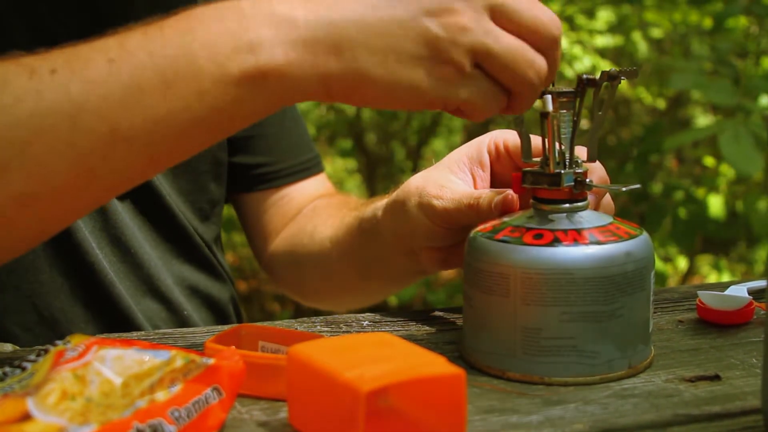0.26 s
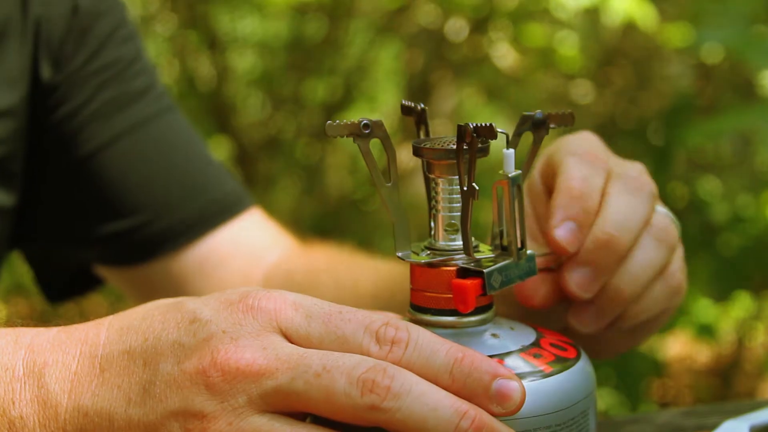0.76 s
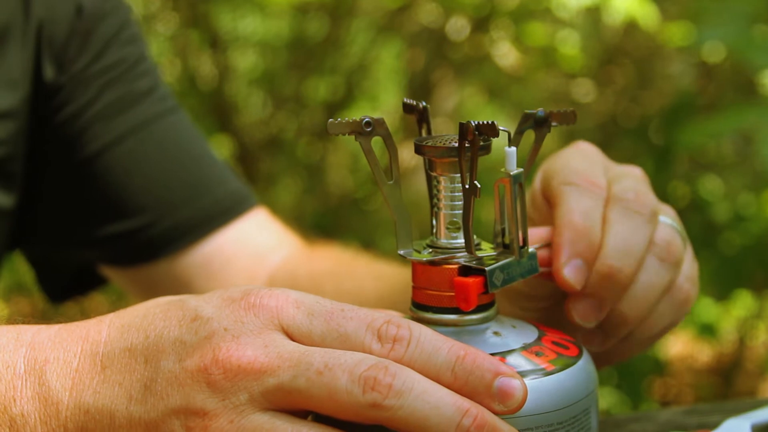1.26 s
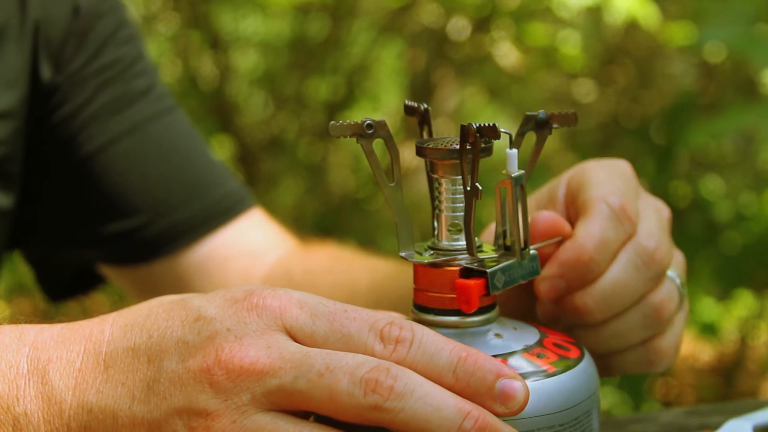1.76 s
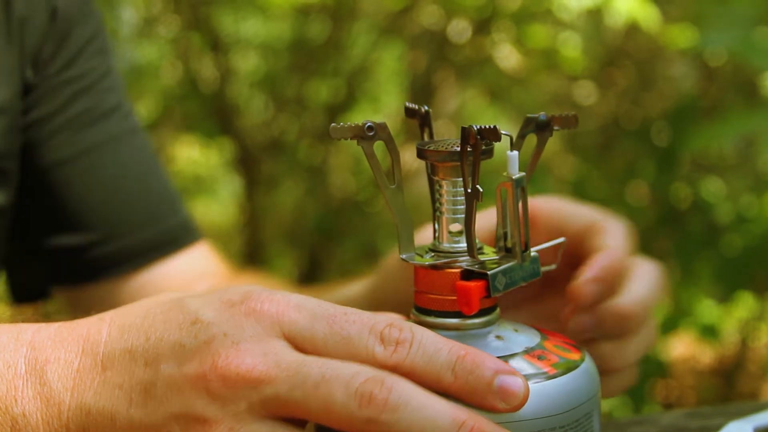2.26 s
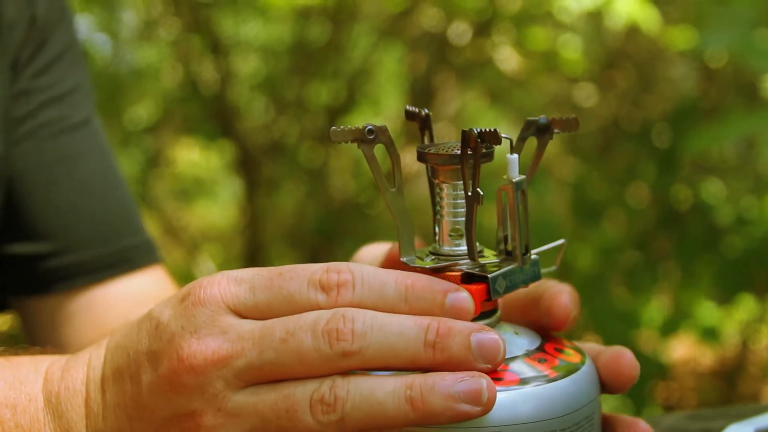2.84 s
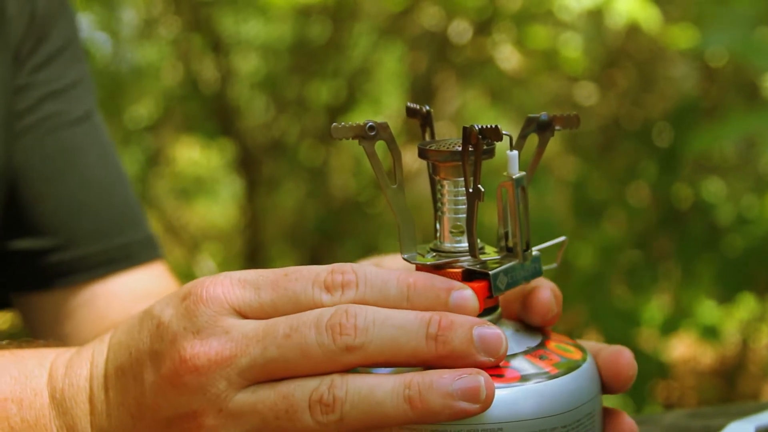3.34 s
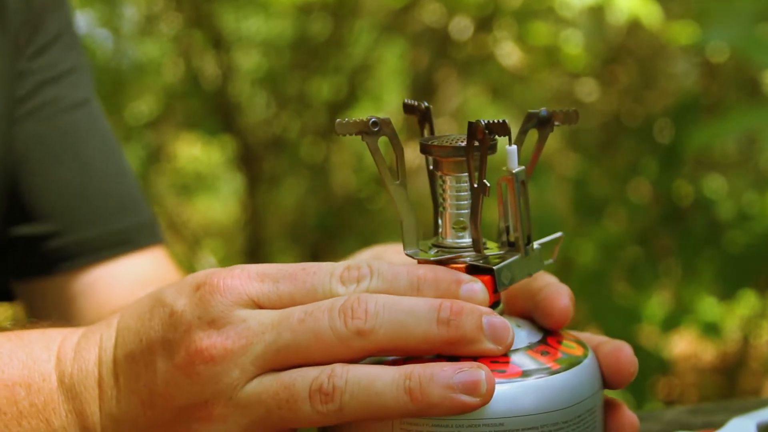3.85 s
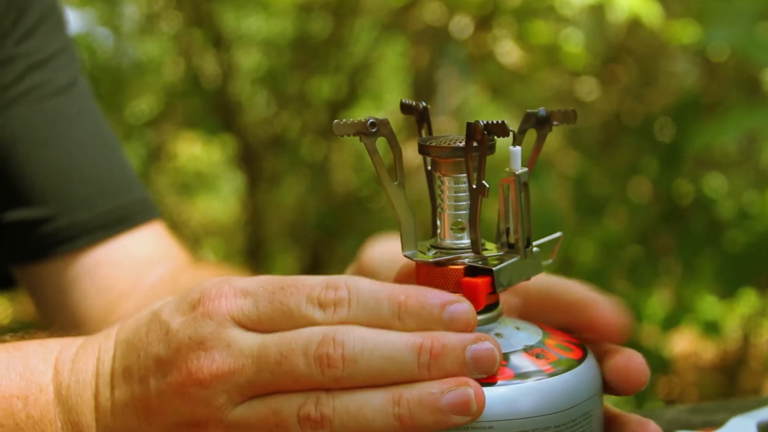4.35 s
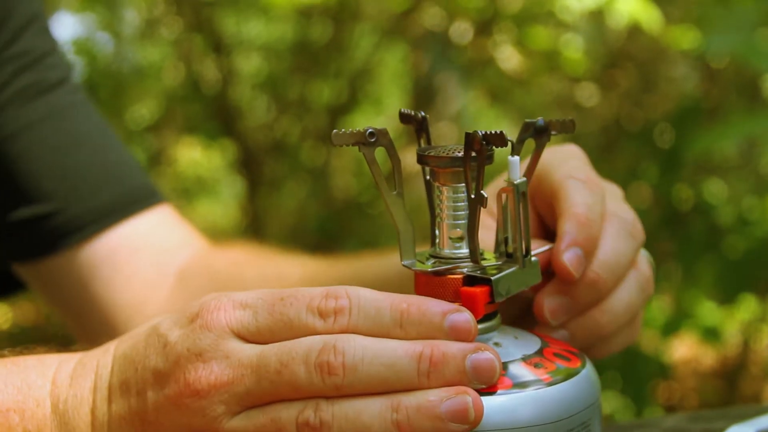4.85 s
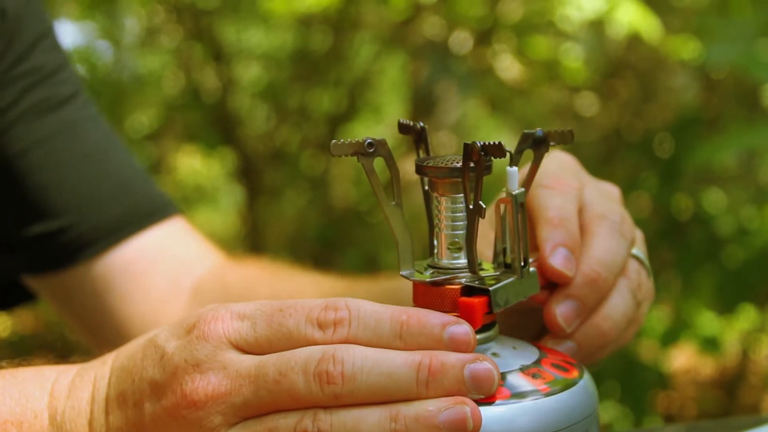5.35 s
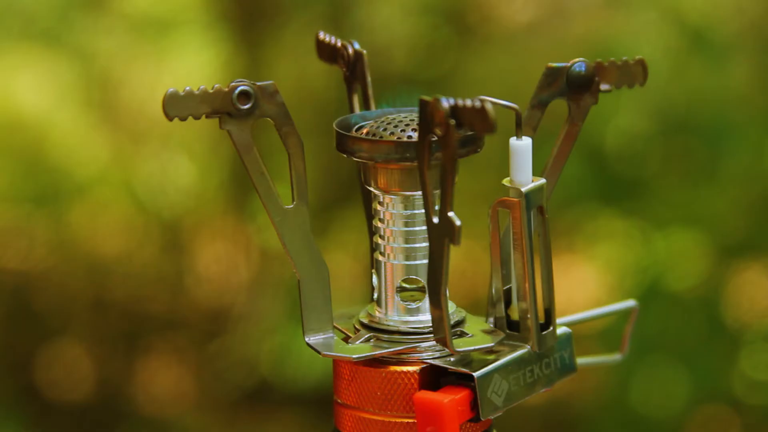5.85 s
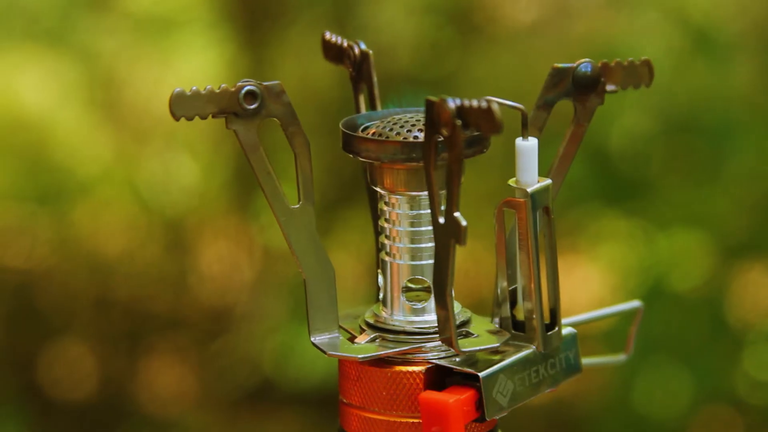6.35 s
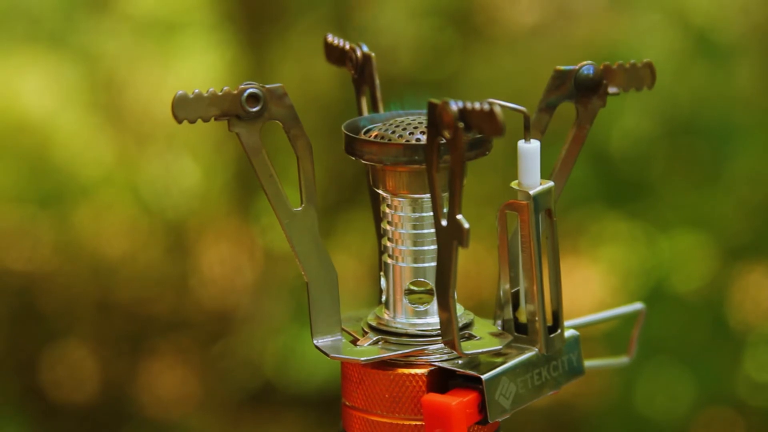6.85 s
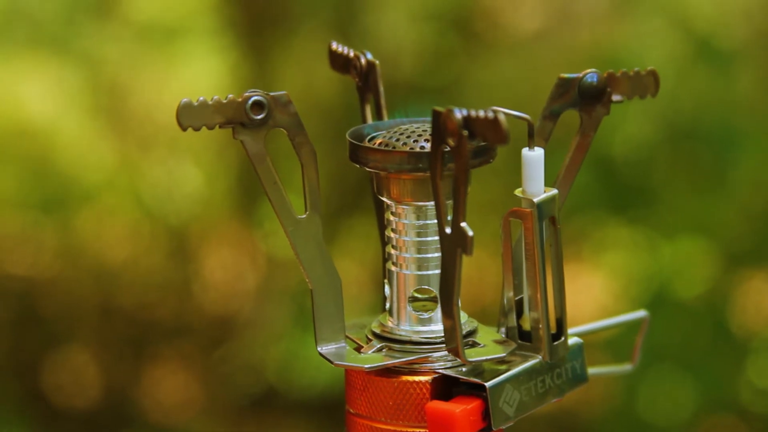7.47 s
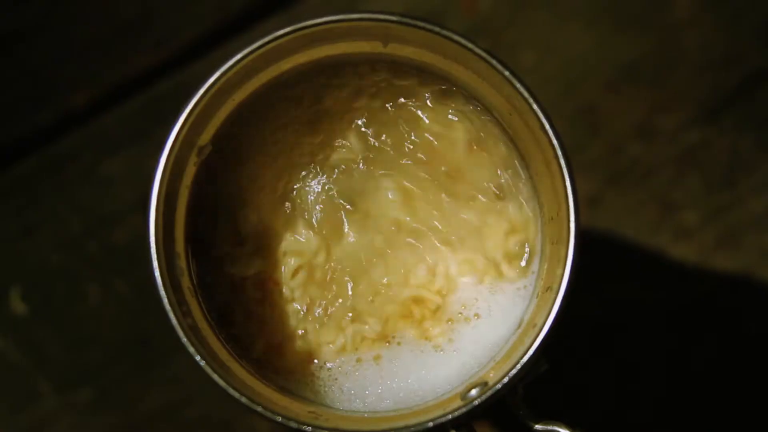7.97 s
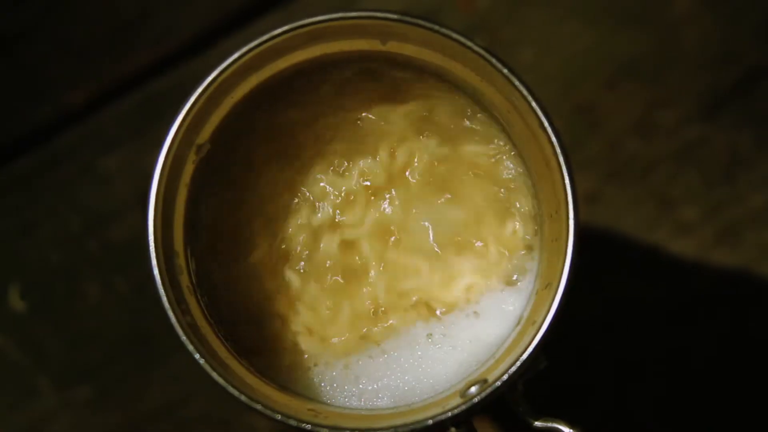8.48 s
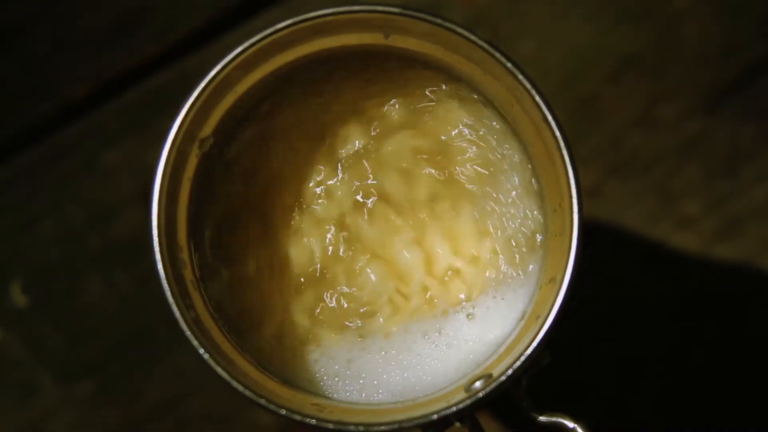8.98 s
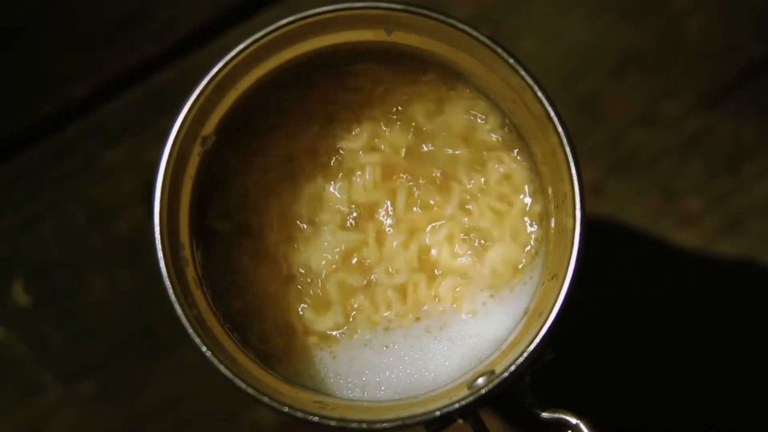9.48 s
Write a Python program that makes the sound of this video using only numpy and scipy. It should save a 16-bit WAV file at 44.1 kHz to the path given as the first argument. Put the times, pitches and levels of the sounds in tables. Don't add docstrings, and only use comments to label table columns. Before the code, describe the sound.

Outdoors, a camp stove clicks, hisses and lights with an overloaded roar, then burns close up with metal knocks before a pot simmers.

```python
import sys
import numpy as np
from scipy import signal
from scipy.fft import rfft, irfft, next_fast_len
from scipy.io import wavfile
from scipy.ndimage import map_coordinates

SR = 44100
rng = np.random.default_rng(int(sys.argv[2]) if len(sys.argv) > 2 else 0)


def transcribe(u):
    v = np.clip(np.atleast_2d(u).T, -1, 1)
    q = np.round(v * 32767).astype(np.int16)
    wavfile.write(sys.argv[1], SR, q)


def volts_from_decibels(level):
    exponent = np.asarray(level, float) / 20
    return 10 ** exponent


N = 428652


def rms_one(x):
    return x / np.sqrt(np.mean(x ** 2) + 1e-20)


def in_time(rows):
    s, *columns = np.transpose(rows)
    first = max(round(s[0] * SR), 0)
    last = min(round(s[-1] * SR), N)
    t = np.arange(first, last) / SR
    return first, [np.interp(t, s, column) for column in columns]


def add(track, first, sound):
    track[first:first + len(sound)] += sound


def low_pass(x, hz):
    return signal.sosfilt(signal.butter(2, hz, fs=SR, output="sos"), x)


def high_pass(x, hz):
    return signal.sosfilt(signal.butter(2, hz, "high", fs=SR, output="sos"), x)


def drift(size, rate):
    r = np.exp(-128 * np.pi * rate / SR)
    coarse = rng.standard_normal(size // 64 + 1002)
    slow = signal.lfilter([1], [1, -2 * r, r * r], coarse)[1000:]
    return np.interp(np.arange(size) / 64, np.arange(len(slow)), rms_one(slow))


def turbulence(spectrum, size, gust_db, patchy_db, count=6):
    padded = next_fast_len(size)
    log_hz = np.log(np.arange(1, padded // 2 + 2) * SR / padded)
    hz, db = np.transpose(spectrum)
    colour = volts_from_decibels(np.interp(log_hz, np.log(hz), db, left=-90, right=-90))
    tone = rfft(rng.standard_normal(padded)) * colour
    place = np.interp(log_hz, np.log(hz[[0, -1]]), [0, count - 1])
    together = gust_db * (drift(size, 4.6) + drift(size, 24))
    total = np.zeros(size)
    for k in range(count):
        band = irfft(tone * np.clip(1 - abs(place - k), 0, 1), padded)[:size]
        total += band * volts_from_decibels(patchy_db * drift(size, 2.25))
    return rms_one(total * volts_from_decibels(together))


def narrow(centre_hz, width_hz):
    slow = low_pass(rng.standard_normal((2, len(centre_hz))), width_hz / 2)
    turn = 2 * np.pi * np.cumsum(centre_hz) / SR
    return rms_one(slow[0] * np.cos(turn) + slow[1] * np.sin(turn))


def ring(clicks, hz, t60):
    r = volts_from_decibels(-60 / (max(t60, .002) * SR))
    w = 2 * np.pi * min(hz, 20000) / SR
    return signal.lfilter([0, np.sin(w)], [1, -2 * r * np.cos(w), r * r], clicks + 1e-18)


def contact_crack(t, decay_s):
    return signal.lfilter([.5], [1, -.45], rng.standard_normal(len(t))) * np.exp(-t / decay_s)


def strike(track, hits, modes, trim_db, rattle_s, crack_db=-40):
    t = np.arange(6000) / SR
    for s, db in hits:
        contact = (1 + .4 * rng.standard_normal(len(t))) * t * np.exp(-t / rattle_s)
        strength_db = rng.normal(0, 1, len(modes))
        body = np.zeros(len(t))
        for k, (hz, level_db, t60) in enumerate(modes):
            tone = rms_one(ring(contact, hz, t60)) * np.sqrt(t60)
            body += (-1) ** k * volts_from_decibels(level_db + strength_db[k]) * tone
        crack = contact_crack(t, 0.0013)
        add(track, round(s * SR), volts_from_decibels(db + trim_db) * (body / abs(body).max() + volts_from_decibels(crack_db) * crack))


# (frequency [Hz], level [dB])
BREEZE_COLOUR = [(24, -42), (40, -16), (48, -21), (75, -5.5), (124, -1.5), (141, -6), (500, -19),
                 (650, -58), (1100, -120)]
# (frequency [Hz], level [dB])
INSECT_COLOUR = [(240, -40), (400, -8), (485, -20), (556, -4), (1160, -7), (1760, -5.5), (2910, -5),
                 (3640, 0.5), (4370, -8.5), (6000, -18), (7800, -43), (13200, -120)]
# (frequency [Hz], level [dB])
LEAK_COLOUR = [(2940, -33), (5000, -2), (7020, -5), (7380, -2), (7600, -6), (8300, -9), (10000, -16),
               (13000, -43), (22000, -120)]


def woods():
    view_change_s, end_s = .6, 4.03
    out, size = np.zeros(N), round(end_s * SR)
    later = np.arange(size) >= view_change_s * SR

    def level(before_db, after_db):
        return volts_from_decibels(np.where(later, after_db, before_db))

    air = level(-53.5, -57) * turbulence(BREEZE_COLOUR, size, 1.1, 0.58)
    air += level(-54, -55.5) * turbulence(INSECT_COLOUR, size, 0.87, 0.78)
    air += level(-47, -57.5) * turbulence([(25, 12), (50, -9), (85, -1.5)], size, 2.1, 1.5, count=2)
    air += level(-66, -60.5) * turbulence(LEAK_COLOUR, size, .4, .6, count=3)
    add(out, 0, air)
    return out


# (time [s], peak level [dB])
LEG_HITS = [
    (0.3601, -22.5),
    (0.371, -22.5),
]
# (frequency [Hz], level [dB], t60 [s])
LEG_TONES = [(644, -5, 0.027), (800, 2, 0.036), (965, -4, 0.038), (354, -10.5, 0.028), (2370, -22, 0.022),
             (1200, -17.5, 0.032)]
# (frequency [Hz], level [dB], t60 [s])
TINE_TONES = [(5250, -3, 0.022), (6050, -6, .01), (7080, -11, 0.023), (8000, 0, 0.005), (9500, -4, .006),
              (11000, -8, .006), (14000, -14, .004)]


def support_leg(track):
    strike(track, LEG_HITS, LEG_TONES, 1.2, 0.00058)
    strike(track, LEG_HITS[1:], TINE_TONES, -7.0, 0.0024)


def tink(hz, t60, crack_db):
    t = np.arange(6000) / SR
    rise = 1 - np.exp(-t / 0.00047)
    tone = np.sin(2 * np.pi * hz * t) * rise * volts_from_decibels(-60 * t / t60)
    return tone / abs(tone).max() + volts_from_decibels(crack_db) * contact_crack(t, 0.0011)


# (time [s], peak level [dB], pitch [Hz], t60 [s], crack re peak [dB])
LONE_TINKS = [(.3605, -37, 5500, 0.028, -6), (.364, -41, 6100, .015, -3), (.372, -46, 8200, .03, -20),
              (.361, -42, 8800, .012, 0), (.373, -42, 2350, .025, -20), (.393, -48, 5350, .04, -6),
              (.365, -33, 770, .03, -30), (.379, -43, 850, .04, -20), (.401, -50, 5400, .05, -6),
              (6.1695, -20, 1300, .012, -30), (6.174, -23, 3700, .012, -30), (0.372, -33.5, 7080, .1, 2),
              (.386, -46, 7150, 0.06, -3), (.385, -45, 5430, .07, -3), (.391, -46, 900, .06, -20),
              (.387, -43, 11400, .015, -20), (.529, -44, 780, .05, -20), (0.589, -47, 1000, .03, -20),
              (3.9, -37, 950, .03, -20), (4, -17, 3400, 0.0053, 4), (4.196, -17, 1800, .008, -10),
              (5.999, -26, 4000, .008, -8), (6.364, -18.5, 3800, 0.016, -30), (6.366, -21, 1900, .016, -30),
              (6.17, -16, 1800, .02, -30), (7.3, -13, 300, 0.037, -40), (7.3983, -11, 870, 0.06, -11),
              (7.3975, -22, 2500, .003, 0), (7.401, -30, 4800, .03, -20), (7.417, -21.5, 5150, 0.012, -10),
              (7.431, -27, 5300, .01, -10), (7.425, -31, 4900, .02, -20), (7.452, -29, 5900, .01, -10),
              (7.429, -29, 3600, .05, -20), (7.441, -25, 7300, .004, 2), (7.442, -26, 5760, .015, -10),
              (7.461, -25, 3200, 0.007, -6), (7.466, -23, 3170, .007, -12),
              (7.473, -17.5, 3500, 0.016, -30), (6.075, -29, 4000, .005, -6), (6.258, -21, 1260, .008, -20),
              (7.83, -46, 1090, 0.037, -20), (9.645, -32, 3600, .02, -25)]


def lone_tinks(track):
    for s, db, hz, t60, crack_db in LONE_TINKS:
        add(track, round(s * SR), volts_from_decibels(db) * tink(hz, t60, crack_db))


# (frequency [Hz], level per Hz [dB])
JET_COLOUR = [(2940, -19.5), (5000, -11.5), (6450, -8), (7160, 0.5), (7930, 1), (9300, -0.5), (10000, -8.5),
              (13000, -35), (22000, -120)]
# (frequency [Hz], level [dB])
LOW_HISS_COLOUR = [(150, -23), (250, -12), (358, -19), (531, -16), (875, -11.5), (1060, -15.5),
                   (1640, -8.5), (2310, -9), (3300, -1), (4610, -4), (5300, -3.5), (6890, 0), (11700, -120)]
# (frequency [Hz], level [dB])
HIGH_HISS_COLOUR = [(6180, -41), (10500, -13), (11100, -10.5), (12100, -4), (13800, -11), (15100, -6.5),
                    (15700, -10)]
# (time [s], throat gain [dB], upper gain [dB])
HAND_SHIFTS = [(1.5, 4, 7.5), (1.9, -15, -6.5), (2.55, 6.5, 8), (3.1, 5, 5), (3.85, -3, 8), (4.3, 3, -5),
               (5.1, 3, 0)]
# (time [s], jet level [dB], broad hiss re jet [dB])
VALVE_OPENING = [
    (1.0, -91, 6),
    (1.19, -53, 1.5),
    (1.31, -32, -11),
    (1.5, -30.5, -9.5),
    (1.56, -28, -5),
    (2.04, -28, -4.5),
    (4.0, -26.5, -6),
    (4.06, -27.5, -3),
    (5.7, -27.5, -3.5),
    (5.81, -27.5, -3.5),
]


def gas_jet():
    half_open_db, open_db, shift_s, lit_s = -32, -28, 0.28, 4.18
    out, (first, (db, low_db)) = np.zeros(N), in_time(VALVE_OPENING)
    size = len(db)
    t = (first + np.arange(size)) / SR
    throat_db, upper_db = np.zeros(size), np.zeros(size)
    for s, throat_gain_db, upper_gain_db in HAND_SHIFTS:
        swell = np.exp(-((t - s) / shift_s) ** 2)
        throat_db += swell * throat_gain_db
        upper_db += swell * upper_gain_db
    throat_hz = 7790 + 1000 * np.clip((open_db - db) / (open_db - half_open_db), 0, 1)
    high_db = low_db - 10.5 + 1.5 * (t > lit_s) + 1.2 * np.minimum(db - half_open_db, 0)
    jet = turbulence(JET_COLOUR, size, .25, 1.1, count=12)
    jet = jet + volts_from_decibels(-8 + throat_db) * narrow(throat_hz, 900)
    jet = jet + volts_from_decibels(-22.5 + upper_db) * narrow(np.full(size, 10350.), 350)
    jet = jet + volts_from_decibels(low_db) * turbulence(LOW_HISS_COLOUR, size, 0.28, 0.39)
    jet = jet + volts_from_decibels(high_db) * turbulence(HIGH_HISS_COLOUR, size, 0.24, 0.74)
    add(out, first, volts_from_decibels(db) * jet)
    return out


# (time [s], echo delay [ms], echo share [0-1])
HAND_ECHO = [(0, 0.77, .1), (2.3, 0.96, .09), (2.6, 0.66, 0.061), (4.6, 0.69, 0.053), (5.89, 0.89, 0.067),
             (6.22, 0.75, 0.14), (6.34, 0.56, 0.14), (6.45, 0.53, .05), (6.8, .67, 0.069),
             (7.6, 0.62, 0.12), (7.93, 0.66, 0.17)]


def off_hands(x):
    first, (hand_ms, hand_share) = in_time(HAND_ECHO)
    size = len(hand_share)
    now = np.arange(size)
    bright = high_pass(x, 2500)
    canister_ms = 1.45 + 0.263 * drift(size, 1.0)

    def echo(ms):
        return map_coordinates(bright, [now - ms * SR / 1000], order=3)

    out = x.copy()
    add(out, first, hand_share * echo(hand_ms) + .1 * echo(canister_ms))
    return out


# (time [s], centre [Hz], depth [0-1])
MOVING_GAPS = [
    [(5.888, 5940, 0.5), (6.1, 6300, .7), (6.25, 6300, .6), (6.4, 5600, .7), (6.5, 5000, 0.4),
     (6.9, 5000, 0.57), (7.4, 4950, 0.6)],
    [(6.6, 7600, 0), (6.8, 7600, 0.5), (7.2, 7600, 0.5), (7.35, 7600, 0.2), (7.55, 7600, .5),
     (7.93, 7800, .3)],
    [(2.5, 9900, 0), (2.75, 10000, 0.4), (4.0, 9600, .6), (5.8, 9500, 0)],
    [(2.3, 3500, 0), (2.5, 3500, 0.24), (4.0, 3500, 0.1)],
    [(4.05, 4660, 0.26), (5.8, 4630, 0.4)],
    [(1.1, 5250, .35), (1.6, 5200, 0.2), (2.3, 5250, .25), (2.5, 5300, .3), (3.3, 5300, .3),
     (4.0, 5200, .1)],
    [(1.4, 4550, .2), (1.7, 4550, 0.3), (2.6, 4500, .3), (3.2, 4600, 0.5), (4.04, 4700, .4)],
    [(1.2, 8500, .1), (1.8, 8450, .3), (2.3, 8400, .3), (2.5, 8600, 0)],
    [(2.3, 6800, 0), (2.45, 6860, 0.4), (2.7, 7100, .5), (2.9, 6800, 0.2), (4.0, 6500, 0)],
    [(1.5, 2880, 0.15), (2.35, 2880, .25), (2.5, 2800, 0), (4.0, 2800, .05)],
]
GAP_WIDTHS = (416.67, 900, 463, 800, 700, 300, 300, 300, 350, 400)


def nulls(x):
    out = x.copy()
    for rows, width_hz in zip(MOVING_GAPS, GAP_WIDTHS):
        first, (hz, depth) = in_time(rows)
        turn = np.exp(2j * np.pi * np.cumsum(hz) / SR)
        low = signal.butter(2, width_hz / 2, fs=SR, output="sos")
        slow = signal.sosfiltfilt(low, out[first:first + len(hz)] / turn)
        add(out, first, -2 * np.clip(depth, 0, 1) * (slow * turn).real)
    return out


# (time [s], peak level [dB])
SNAP_HITS = [
    (4.0292, -12),
    (4.0301, 1),
    (4.0328, -12),
]
# (frequency [Hz], level [dB], t60 [s])
SNAP_TONES = [(900, 8, 0.016), (2580, 2.5, 0.012), (3500, 3.5, 0.008), (5000, -9, .006), (7600, 10, 0.0032),
              (10600, 6, 0.0036), (12000, 3, 0.0016), (15500, 0, 0.0053)]


def igniter(track):
    strike(track, SNAP_HITS, SNAP_TONES, 4, 0.0007, crack_db=-4)


# (time [s], roar level [dB])
FLARE_LEVEL = [
    (4.032, -22),
    (4.07, -21.5),
    (4.25, -18),
    (4.9, -18.5),
    (5.39, -19.5),
    (5.478, -17),
    (5.562, -20.5),
    (5.67, -16.5),
    (5.81, -22),
]
# (frequency [Hz], level [dB])
ROAR_COLOUR = [(12, -49), (20, -17.5), (22, -28), (27, -28.5), (108, -4.5), (203, 0), (348, -3), (425, -12),
               (579, -10.5), (752, -25), (800, -28), (1040, -41), (1760, -120)]
# (frequency [Hz], level [dB])
LICK_COLOUR = [(410, 1.5), (700, 1.5), (758, -7), (926, 2), (1050, -5.5), (1270, 2), (2660, -8),
               (3000, -35), (3900, -33), (6600, -120)]


def flare():
    out, (first, (db,)) = np.zeros(N), in_time(FLARE_LEVEL)
    add(out, first, volts_from_decibels(db + 1.5) * turbulence(ROAR_COLOUR, len(db), 0.27, 0.3))
    add(out, first, volts_from_decibels(-29) * turbulence(LICK_COLOUR, len(db), 0.1, 0.1))
    t = np.arange(1500) / SR
    thump = np.sin(2 * np.pi * (125 * t + 1300 * t ** 2)) * np.exp(-t / 0.011)
    add(out, round(4.0335 * SR), 0.86 * thump * np.clip(t / 0.0091, 0, 1))
    push = np.sin(2 * np.pi * 60 * t) * np.exp(-t / 0.032)
    add(out, round(4.034 * SR), -.15 * push)
    return out


# (time [s], roar level [dB], middle level [dB], hiss level [dB])
CLOSE_LEVELS = [
    (5.85, -26, -34.5, -38.5),
    (7.93, -26, -35.5, -39),
]
# (time [s], roar level [dB], middle level [dB], hiss level [dB])
POT_LEVELS = [
    (7.932, -33, -42.5, -50.5),
    (9.76, -33, -43, -54),
]
# (frequency [Hz], level [dB])
CLOSE_COLOURS = [
    [(24, -48), (40, -16.5), (101, -7), (252, -0.5), (391, -4.5), (471, -10), (530, -5), (605, -3.5), (789, -13), (854, -12.5), (950, -16.5), (1240, -41), (2090, -120)],
    [(500, -37), (850, -4.5), (1020, -7), (1150, 0.5), (1370, -4.5), (1540, -3.5), (1890, -9.5), (2670, -15), (3350, -9.5), (3750, -11.5), (4100, -23), (4300, -27), (5590, -52), (9460, -120)],
    [(2410, -44), (4100, -10), (4510, -3), (4940, -8), (5280, -2), (6040, -3.5), (6570, -0.5), (7740, -3), (9050, 1), (10000, -3.5), (10700, -13), (11700, -18), (14800, -20), (15700, -21)],
]
# (frequency [Hz], level [dB])
POT_COLOURS = [
    [(24, -39), (40, -1), (54, -4.5), (97, -7.5), (171, -1), (220, -3), (312, -1.5), (354, 1), (497, -5), (630, -18), (800, -30), (1040, -49), (1760, -120)],
    [(410, -35), (700, -11), (775, -6.5), (922, -1.5), (1090, 0.5), (1410, -4.5), (1560, -4.5), (1820, -7.5), (2260, -3), (2780, -6), (3520, 0), (4600, -12), (5980, -45), (10100, -120)],
    [(2590, -15), (4400, -2), (5770, -5), (7220, -5), (11600, -13.5), (15100, -18), (15700, -15)],
]


def burner(rows, colours, gust_db):
    out, (first, levels_db) = np.zeros(N), in_time(rows)
    for db, colour in zip(levels_db, colours):
        add(out, first, volts_from_decibels(db + 0.5) * turbulence(colour, len(db), gust_db, 0.55, count=9))
    return out


# (time [s], centre [Hz], level [dB])
HEAD_GLIDE = [
    (5.888, 6980, -48),
    (6.0, 5630, -57),
    (6.15, 5920, -57),
    (6.2, 6800, -46),
    (6.35, 6800, -43),
    (6.45, 6470, -52),
    (7.3, 6650, -49),
    (7.55, 6420, -50),
    (7.932, 6720, -41.5),
]


def head_whistle():
    out, (first, (hz, db)) = np.zeros(N), in_time(HEAD_GLIDE)
    add(out, first, volts_from_decibels(db) * narrow(hz, 600))
    return out


# (time [s], peak level [dB])
KNOCK_HITS = [
    (6.1673, -5.5),
    (6.3631, -11.5),
]
# (frequency [Hz], level [dB], t60 [s])
KNOCK_TONES = [(1000, -5, .012), (1350, 2.5, .02), (1790, -2, 0.024), (2340, 0, 0.01), (2650, 1.5, 0.012),
               (3050, 5.5, 0.007), (3770, -9, 0.022), (4200, -8, .012), (5000, -9, .008)]


def table_knocks(track):
    strike(track, KNOCK_HITS, KNOCK_TONES, 1.7, 0.00025)


def metal():
    track = np.zeros(N + SR)
    for source in (support_leg, lone_tinks, igniter, table_knocks):
        source(track)
    return high_pass(track[:N], 220)


# (time [s], peak level [dB], pitch [Hz])
BIG_BUBBLES = [(7.961, -30, 1360), (7.991, -32, 1070), (8.006, -35, 1350), (8.037, -26, 1080),
               (8.067, -29, 937), (8.091, -32, 972), (8.14, -23, 939), (8.174, -32, 1090),
               (8.212, -29, 1320), (8.233, -29, 1060), (8.251, -24, 1590), (8.305, -28, 1100),
               (8.327, -32, 958), (8.352, -26, 1050), (8.385, -31, 1200), (8.399, -27, 1180),
               (8.444, -26, 1040), (8.524, -25.5, 1490), (8.55, -31, 1210), (8.606, -29, 1030),
               (8.714, -30, 1120), (8.76, -25, 980), (8.805, -35, 1090), (8.875, -32, 910),
               (8.906, -33, 856), (8.995, -25, 1080), (9.047, -32, 1110), (9.091, -32, 1290),
               (9.121, -25.5, 1080), (9.145, -29, 1240), (9.191, -32, 1130), (9.27, -31, 1150),
               (9.453, -32, 899), (9.487, -34, 1050), (9.502, -30, 929), (9.547, -35, 883),
               (9.613, -39, 886), (9.644, -32, 848), (9.691, -33, 807), (8.047, -28, 1000),
               (8.103, -31, 1050), (8.147, -28, 1300), (8.895, -30, 1250), (8.907, -32, 1100),
               (9.007, -26, 1050), (9.026, -32, 1200), (8.5245, -27, 1050), (8.761, -27, 1450),
               (9.1215, -29, 1400)]
# (time [s], peak level [dB])
DROPLETS = [(8.1254, -34), (8.1377, -26), (8.4208, -32), (8.4771, -28), (8.5235, -34), (8.6475, -28),
            (8.7096, -36), (8.76, -31), (8.9725, -29), (9.055, -27), (9.2209, -33)]


def simmer():
    out, first = np.zeros(N + SR), round(7.932 * SR)
    for s, db, hz in BIG_BUBBLES:
        tones = [(hz, 0, 18.0 / hz), (1.64 * hz, 0, .008), (2300, -2.5, .007)]
        strike(out, [(s, db)], tones, 1.84, 0.00022)
    strike(out, DROPLETS, [(9000, 0, .003), (13000, 0, 0.0025)], -9.0, .0003, crack_db=8.5)
    size = N - first
    starts = rng.random(size) < 220 / SR
    sizes = volts_from_decibels(3.6 * np.minimum(rng.exponential(1, size), 4)) * starts
    dealt = rng.integers(0, 10, size)
    for k, hz in enumerate(np.geomspace(880, 1450, 10)):
        add(out, first, volts_from_decibels(-43.5) * ring(sizes * (dealt == k), hz, 7.7 / hz))
    return out[:N]


def scene():
    gas = gas_jet() + flare() + head_whistle()
    gas += burner(CLOSE_LEVELS, CLOSE_COLOURS, 0.43) + burner(POT_LEVELS, POT_COLOURS, 0.61)
    mono = nulls(off_hands(gas)) + woods() + metal() + simmer()
    return np.array([mono, mono])


# (start [s], end [s], recorder gain [dB])
VIEWS = [
    (0, 5.805, 0),
    (5.888, 7.932, 8.8),
    (7.932, 9.73, 13),
]


def recorder_gain():
    gain = np.zeros(N)
    for start, end, gain_db in VIEWS:
        gain[round(start * SR):round(end * SR)] = volts_from_decibels(gain_db)
    return gain


def top_cut(x):
    return signal.sosfilt(signal.butter(12, 17010, fs=SR, output="sos"), x)


def record(dry):
    offset, ceiling = np.array([.0363, .0215]), .252
    hiss_db, wobble_db, cutoff_hz = -62, -53, 15780
    gain = recorder_gain()
    wobble_band = signal.butter(3, [7, 13], "band", fs=SR, output="sos")
    wobble = signal.sosfilt(wobble_band, rng.standard_normal(N + SR))[SR:]
    hiss = signal.lfilter([1, .05], [1], rng.standard_normal((2, N)))
    signal_in = dry / np.maximum(gain, 1) + volts_from_decibels(wobble_db) * rms_one(wobble) + np.mean(offset)
    clipped = np.clip(signal_in, -ceiling, ceiling)
    out = gain * (clipped + volts_from_decibels(hiss_db) * hiss + (offset - np.mean(offset))[:, None])
    out = signal.sosfilt(signal.ellip(10, .2, 80, cutoff_hz, fs=SR, output="sos"), out)
    return top_cut(out)


dry = scene()
out = record(dry)
transcribe(out)
```